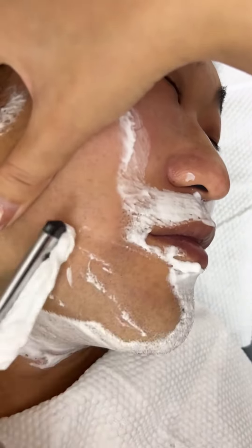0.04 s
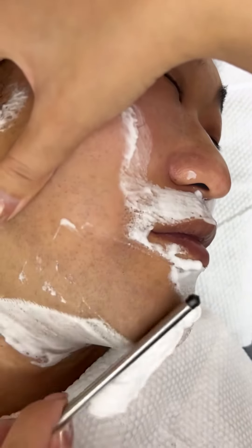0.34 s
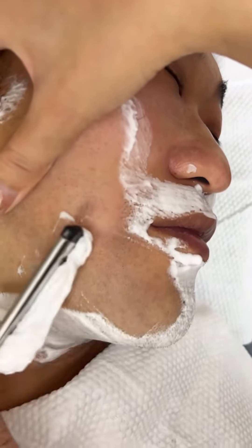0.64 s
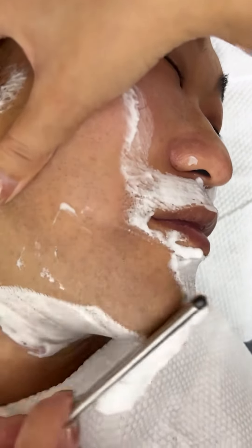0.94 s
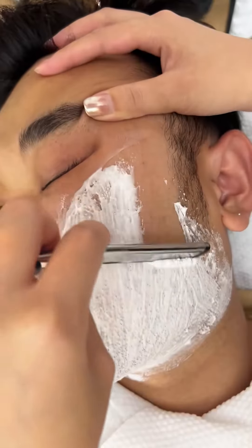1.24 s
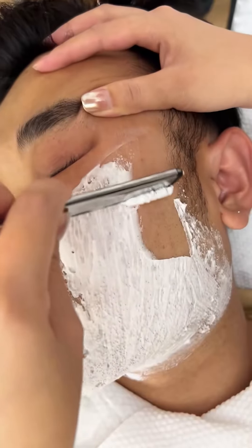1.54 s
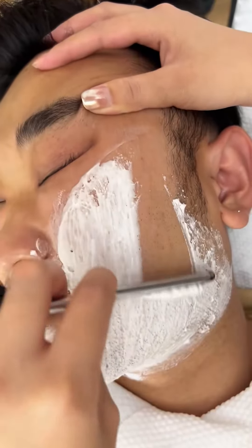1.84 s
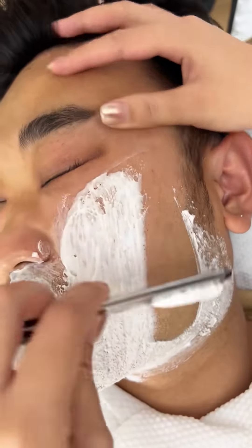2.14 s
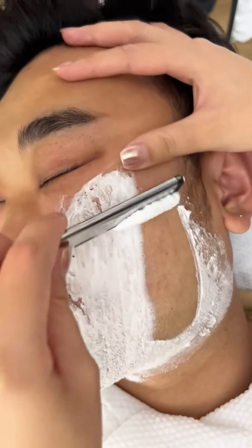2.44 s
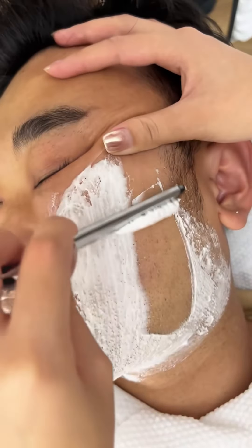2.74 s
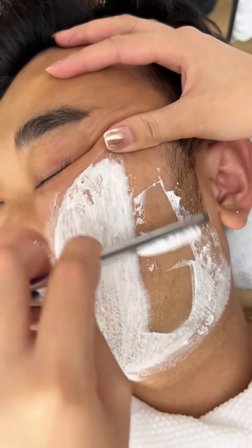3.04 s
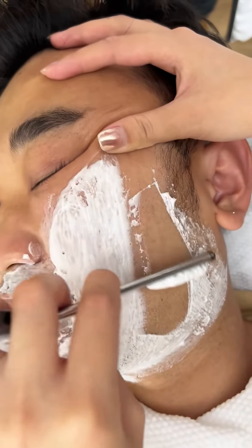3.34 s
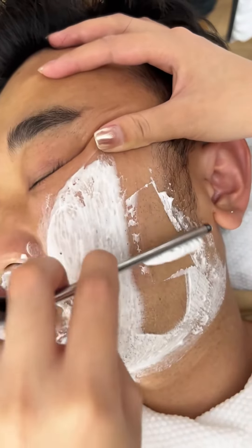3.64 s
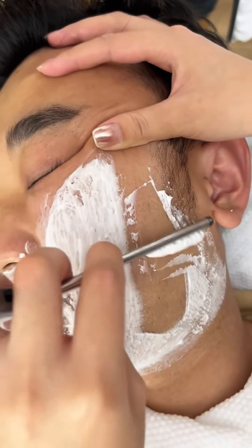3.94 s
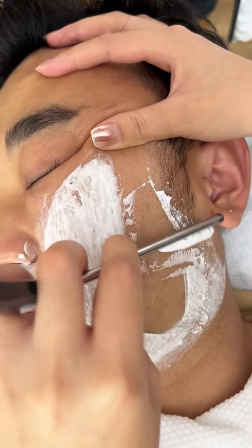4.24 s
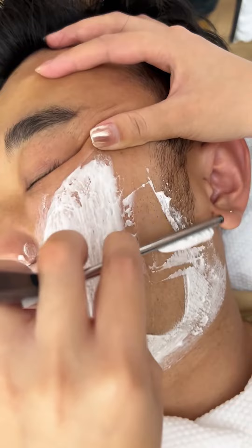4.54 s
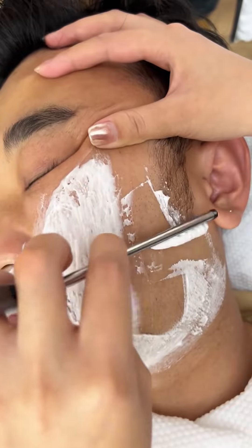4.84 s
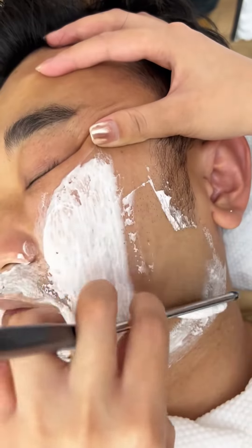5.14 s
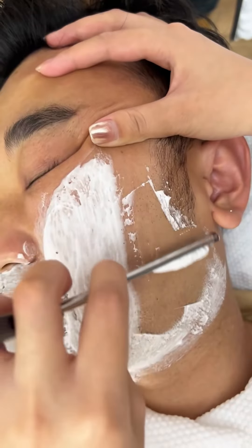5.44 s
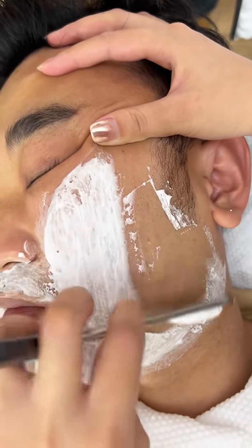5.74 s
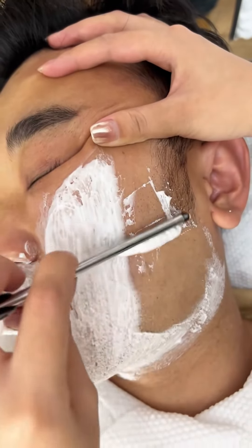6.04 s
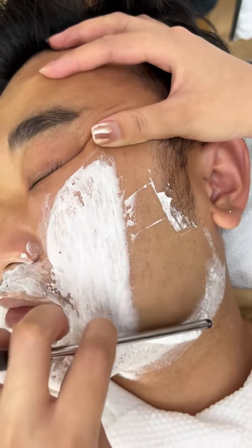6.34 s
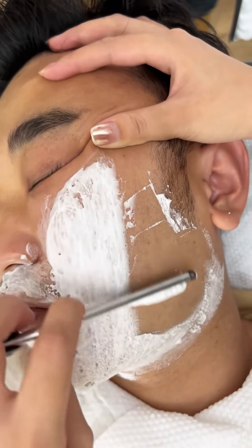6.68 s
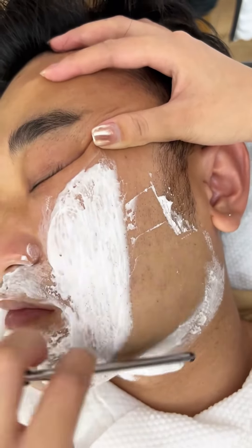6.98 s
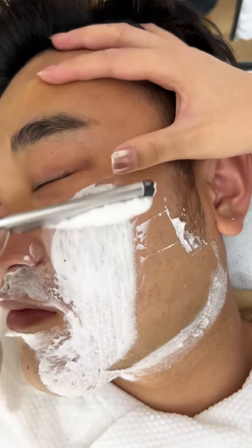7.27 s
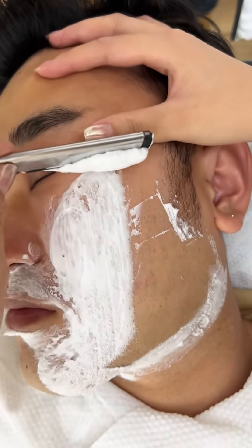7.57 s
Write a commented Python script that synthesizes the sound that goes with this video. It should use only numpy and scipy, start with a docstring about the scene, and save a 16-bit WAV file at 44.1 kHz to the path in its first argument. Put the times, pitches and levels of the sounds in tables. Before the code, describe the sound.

In a quiet shop with a faint ventilation hum, a straight razor rasps through stubble, heard very close. It opens with two longer, bright scrapes, then moves to quick, uneven strokes mixed with the light hiss of steel gliding on lather. Tiny snaps of cut hair and a few dull hand bumps come through, and the last strokes are fuller and louder.

```python
"""A straight razor shaves a lathered face, close up: two long strokes on the chin, then short ones
down the cheek to the jaw. The edge catches and snaps stubble in quick uneven ticks over a fine
crackle; between cuts the blade slides on lather with a soft hiss. Hands bump softly now and then,
and the ventilation of a small shop hums behind."""
import sys
import numpy as np
from scipy import signal
from scipy.fft import rfft, irfft
from scipy.io import wavfile
from scipy.ndimage import uniform_filter1d, map_coordinates

SR = 44100
rng = np.random.default_rng(int(sys.argv[2]) if len(sys.argv) > 2 else 0)


def digitize_waveform(pressure):
    """Quantize a signal to 16-bit integers and store it at the path in sys.argv[1].

    Rows of a 2-D input are taken as channels; values are limited to [-1, 1].
    """
    field = np.atleast_2d(pressure).T
    bounded = np.clip(field, -1, 1)
    quanta = np.round(bounded * 32767).astype(np.int16)
    wavfile.write(sys.argv[1], SR, quanta)


N = 344421
T = np.arange(N) / SR

# tone of blade and skin at each place on the face: freq_hz, gain_db
CHIN_EQ = [(300, -16.5), (700, -29.5), (1200, -25), (1800, -17), (2400, -6.5), (2950, -20), (3900, -0.5),
           (4900, -6), (6200, 4.5), (8000, -3.5), (9000, -7.5), (12500, -9.5), (15500, -25.5)]
CHEEK_EQ = [(300, -13), (650, -24.5), (1100, -15), (2000, -14), (2500, -5), (3100, -14.5), (3700, -10),
            (4800, -3), (6200, -0.5), (8300, -4), (9000, -6), (10800, -13), (13000, -6.5), (15500, -21)]
LOWER_CHEEK_EQ = [(300, -12.5), (680, -22.5), (1200, -7), (1500, -15.5), (2000, -10.5), (2450, -3.5),
                  (3200, -13.5), (3700, -7), (4700, 4.5), (6200, -2), (8000, -4), (11000, -13.5),
                  (12700, -7), (15500, -25)]
JAW_EQ = [(300, -11), (680, -23.5), (1150, -5), (1450, -12.5), (1900, -6), (2350, 1.5), (3050, -15),
          (3700, -5), (4700, -2.5), (5500, -8), (7800, -7), (11000, -10), (12700, -10), (15500, -25)]
# cutting strokes, with body (lows) and fizz (top) relative to the scrape:
# start_s, attack_s, hold_s, release_s, scrape_db, release_fall_db, body_db, fizz_db, place
CUTTING_STROKES = [ (0.166, 0.067, 0.13, 0.057, -27, 16, -12.5, -8.5, "chin"),
                   (0.724, 0.08, 0.2, 0.0066, -26.5, 3, -14, -8.5, "chin"),
                   (1.126, 0.033, .12, 0.037, -45, 10, -16, 0, "cheek"),
                   (1.775, 0.088, .015, 0.19, -34, 19, -12.5, -5.5, "cheek"),
                   (2.836, .065, .045, 0.034, -47.5, 15, -9.5, -1.5, "cheek"),
                   (3.207, .16, 0.023, .012, -43.5, 8, -12.5, -6, "cheek"),
                   (3.643, 0.028, 0.054, .05, -41.5, 11, -11, -6.5, "cheek"),
                   (3.965, .078, .012, .028, -31.5, 18, -10.5, -10.5, "cheek"),
                   (4.272, 0.046, .04, 0.026, -34.5, 13.5, -12.5, -10.5, "cheek"),
                   (4.561, 0.13, 0.0075, .014, -38, 10, -13.5, -9, "cheek"),
                   (4.955, 0.13, 0.026, 0.073, -31.5, 11, -8, -8, "lower cheek"),
                   (5.521, .075, 0.079, .045, -34.5, 11, -5.5, -9.5, "lower cheek"),
                   (6.207, .07, 0.036, .066, -29.5, 13, -3.5, -11, "jaw"),
                   (6.684, .15, 0.071, 0.064, -24.5, 21, -9.5, -11, "jaw"), ]

# bands in which a layer's level is set
LOW_HZ, MID_HZ, BODY_HZ = (30, 300), (400, 900), (800, 2800)
SCRAPE_HZ, FIZZ_HZ, BRIGHT_HZ = (3200, 9000), (9000, 15000), (3200, 15000)


def undb(db):
    """Decibels to gain."""
    return 10 ** (np.asarray(db) / 20)


def unit(x):
    """Scale to unit power."""
    return x / np.sqrt(np.mean(x ** 2))


def noise():
    """White noise of unit power."""
    return rng.standard_normal(N)


def wander(rate_hz):
    """Smooth random modulation with a spread near 1."""
    hold = int(SR / rate_hz)
    steps = np.repeat(rng.standard_normal(N // hold + 1), hold)
    return 1.296 * uniform_filter1d(uniform_filter1d(steps, hold), hold)[:N]


def below(x, hz):
    """Zero-phase low-pass."""
    return signal.sosfiltfilt(signal.butter(6, hz, fs=SR, output="sos"), x)


def equalise(x, curve, band_hz, size=2048):
    """Minimum-phase EQ; unit white noise comes out with unit power inside the band."""
    hz, db = np.transpose(curve)
    freqs = np.arange(size // 2 + 1) * SR / size
    gain = undb(np.interp(np.log(freqs + 1), np.log(hz), db))
    gain /= np.sqrt(np.mean(gain ** 2 * ((freqs > band_hz[0]) & (freqs < band_hz[1]))))
    cepstrum = irfft(np.log(gain))
    cepstrum[1:size // 2] *= 2
    cepstrum[size // 2 + 1:] = 0
    return signal.oaconvolve(x, irfft(np.exp(rfft(cepstrum))))[:N]


def ventilation(rumble_trim_db, rush_trim_db, hiss_db, waver_hz):
    """The air bed: the shop's rumble, rushing air and a wavering hum. Beside it, a broad hiss swells over the
    first second and stops at 1.03 s."""
    # level ride of the bed: time_s, rumble_db, rush_db
    air_levels = [(0, -50, -60.5), (0.95, -51, -59), (1.08, -50, -71), (1.8, -57.5, -71),
                  (2.45, -52.5, -69), (2.85, -56.5, -70.5), (3.85, -54, -71.5), (4.3, -55.5, -67),
                  (6.3, -52, -63), (7.81, -47.5, -62)]
    # tone of each noise layer: freq_hz, gain_db
    rumble_eq = [(20, -8.5), (50, 1), (80, 2), (110, -1), (150, -3), (180, -4.5), (215, 4), (260, -9.5),
                 (340, -15.5), (600, -33), (2000, -61)]
    rush_eq = [(200, -1), (430, 4), (640, -2), (900, 2.5), (1350, -5.5), (1850, 0), (2400, -4.5),
               (3100, -15), (5500, -18), (10000, -34.5), (13800, -34.5), (15000, -42.5)]
    hiss_eq = [(300, -2.5), (900, -1), (1400, -4), (2400, -5), (3000, -6), (6000, -10), (9000, -19.5),
               (14000, -23.5), (15500, -30)]
    # two hum tones: pitch_hz, level_db
    hum_tones = [(200, -66.5), (220, -64)]
    times, *levels = np.transpose(air_levels)
    rumble_db, rush_db = (np.interp(T, times, level) for level in levels)
    rumble = undb(rumble_db + rumble_trim_db + 1.7 * wander(10)) * equalise(noise(), rumble_eq, LOW_HZ)
    rush = undb(rush_db + rush_trim_db + 2 * wander(17)) * equalise(noise(), rush_eq, MID_HZ)
    hiss_swell = np.minimum(T / .86 + .12, 1) * (T < 1.03)
    hiss = undb(hiss_db) * hiss_swell * equalise(noise(), hiss_eq, MID_HZ)
    hum = 0
    for pitch_hz, level_db in hum_tones:
        gain = undb(level_db + 2.5 * wander(4.3))
        hum += gain * np.sin(2 * np.pi * np.cumsum(pitch_hz + waver_hz * wander(14)) / SR)
    dip = undb(-13.5 * np.exp(-.5 * ((T - .76) / .009) ** 2))  # the bed dips briefly
    return (rumble + rush + hiss + hum) * dip


def microphone_hiss(level_db):
    """A faint, even noise floor."""
    return undb(level_db) * below(noise(), 13800)


def ticks(rate_hz, uneven, scatter_db, snap_s, count=12000, size=128):
    """Crackle: tiny releases of force at uneven intervals, each with its own size and tone."""
    gap, strength = rng.standard_normal((count, 2)).T
    travel = np.cumsum(rate_hz * np.ones(N)) / SR
    onsets = np.searchsorted(travel, np.cumsum(np.exp(uneven * gap)))
    age = np.arange(1, size + 1) / (snap_s * SR)
    bursts = rng.standard_normal((count, size)) * np.sqrt(age) * np.exp(-age)
    # capped, as a hair holds only so much force before it is cut
    bursts *= (undb(scatter_db * np.tanh(strength)) / np.linalg.norm(bursts, axis=1))[:, None]
    heard = onsets < N
    samples = onsets[heard, None] + np.arange(size)
    force = np.bincount(samples.ravel(), bursts[heard].ravel(), N)[:N]
    return unit(force / np.sqrt(rate_hz))


def pressure(start, attack, hold, release, fall_db):
    """Span and envelope of one blade pass: it lands, swells as the hand presses, holds, eases, lifts."""
    land_db_per_s, lift_db_per_s = 1500.5, 1200.5
    end = start + attack + hold + release
    span = slice(*np.searchsorted(T, [start - .1, end + .1]))
    t = T[span]
    attack_db = 19 * np.clip(1 - (t - start) / attack, 0, 1) ** 1.9
    ease_db = fall_db * np.clip(1 - (end - t) / release, 0, 1) ** 1.4
    off_skin_db = land_db_per_s * np.maximum(start - t, 0) + lift_db_per_s * np.maximum(t - end, 0)
    return span, undb(-attack_db - ease_db - off_skin_db)


def lather_slides(bubbles_db):
    """Steel on wet skin: a smooth hiss with tiny bursting bubbles of lather."""
    # passes that glide without cutting: start_s, attack_s, hold_s, release_s, level_db
    slides = [ (0.063, 0.096, .01, .02, -46.5), (1.08, 0.021, 0.044, .03, -46.5),
              (1.333, .018, 0.0047, 0.032, -61), (1.556, 0.053, .17, 0.033, -51),
              (2.696, .04, .08, .02, -60), (3.013, 0.019, .005, 0.026, -64),
              (3.196, 0.032, 0.022, 0.019, -57.5), (3.453, 0.024, 0.0046, .04, -61),
              (3.548, 0.026, 0.0056, 0.031, -60.5), (3.809, 0.03, 0.019, 0.069, -53),
              (4.118, 0.033, 0.0049, .06, -41), (4.417, 0.048, 0.012, 0.047, -47),
              (4.747, 0.044, 0.023, 0.057, -43), (4.888, 0.037, 0.05, .03, -53),
              (5.435, 0.031, 0.067, .02, -52.5), (6.03, 0.16, 0.032, 0.018, -48.5),
              (6.617, 0.051, 0.022, .02, -49.5), (6.984, 0.017, 0.0034, .01, -49.5), ]
    # tone of the early slides in thick lather (one narrow resonance) and the rest: freq_hz, gain_db
    thick_eq = [(800, -30.5), (3300, -19.5), (4900, -10.5), (5800, -6), (7000, -1.5), (8300, -9),
                (11000, -11), (13000, -11), (15500, -25.5)]
    slide_eq = [(800, -32), (2300, -18.5), (3200, -13.5), (4600, 1), (5600, 1), (6800, 1.5), (8400, -1),
                (9500, -8.5), (11000, -20.5), (13000, -6), (15500, -27)]
    bubbles = ticks(300, uneven=.8, scatter_db=6, snap_s=.00015)
    gain = np.zeros(N)
    for *timing, level_db in slides:
        span, press = pressure(*timing, fall_db=19)
        gain[span] += undb(level_db) * press
    foam = unit(noise() + undb(bubbles_db) * bubbles) * gain
    thick = T < 2.95
    return equalise(foam * thick, thick_eq, BRIGHT_HZ) + equalise(foam * ~thick, slide_eq, BRIGHT_HZ)


def hand_bumps():
    """Hands shift on the face and towel: a low thud with some dull rustle."""
    # soft bumps, rustle relative to thud: centre_s, level_db, width_s, rustle_db
    bumps = [(0.111, -44, 0.02, -33), (0.283, -43.5, 0.0064, -5), (0.621, -47, 0.019, 0),
             (0.68, -45, 0.0069, -11), (3.077, -54, 0.012, -37), (4.374, -50, .014, -7),
             (4.433, -48, 0.0088, -39), (4.477, -42, 0.0084, -33), (4.891, -44, 0.0087, -24)]
    # tone of thud and rustle: freq_hz, gain_db
    thud_eq = [(40, -9), (135, -7), (210, 8), (290, -10.5), (600, -39), (2000, -52.5)]
    rustle_eq = [(150, -7), (330, -0.5), (900, -9), (1400, -19), (3000, -27), (9000, -37)]
    thud, rustle = np.zeros((2, N))
    for centre_s, level_db, width_s, rustle_db in bumps:
        swell = undb(level_db) * np.exp(-.5 * ((T - centre_s) / width_s) ** 2)
        thud += swell
        rustle += swell * undb(rustle_db)
    return thud * equalise(noise(), thud_eq, LOW_HZ) + rustle * equalise(noise(), rustle_eq, MID_HZ)


def lone_snaps(trim_db, snap_s, tail_db, tail_s, size=600):
    """Sharp ticks, each with a faint tail from nearby surfaces, coloured by where the blade is."""
    # stout hairs and touches of the edge that stand out: start_s, level_db
    accents = [(0.1516, -16), (0.1715, -11), (0.7018, -15.5), (0.7098, -14), (0.7172, -13), (0.7309, -5.5),
               (0.7354, -3), (0.7577, -4), (0.818, -2), (0.8245, 1), (0.8507, -9), (0.9615, 1.5),
               (1.138, -20.5), (1.5983, -22.5), (2.7492, -27), (2.81, -24), (2.829, -21.5), (2.8627, -22),
               (2.8746, -22), (2.904, -18), (3.2956, -19), (3.4277, -23), (3.7806, -23.5), (3.9634, -25),
               (4.049, -17), (4.577, -26), (5.448, -21), (5.533, -17), (6.0562, -24), (6.2647, -10),
               (6.345, -8), (6.3767, -14), (6.9134, -13), (6.9905, -15)]
    t, force = np.arange(size) / SR, np.zeros(N)
    decay = np.exp(-t / snap_s) + undb(tail_db) * np.exp(-t / tail_s)
    for start_s, level_db in accents:
        burst = rng.standard_normal(size) * decay
        onset = int(start_s * SR)
        force[onset:onset + size] += undb(level_db + trim_db) * burst / np.linalg.norm(burst)
    arrivals_s = [min(start for start, *_, where in CUTTING_STROKES if where == place)
                  for place in ("cheek", "lower cheek", "jaw")]
    place_index = np.searchsorted(arrivals_s, T)
    curves = CHIN_EQ, CHEEK_EQ, LOWER_CHEEK_EQ, JAW_EQ
    return sum(equalise(force * (place_index == k), eq, BRIGHT_HZ) for k, eq in enumerate(curves))


def stroke_envelopes(place):
    """Gains of scrape, body and fizz at one place; pressing harder brings out the body."""
    scrape, body, fizz = np.zeros((3, N))
    drag = undb(1.36 * wander(44.84))  # the edge drags unevenly over the skin
    for *timing, scrape_db, fall_db, body_db, fizz_db, where in CUTTING_STROKES:
        if where == place:
            span, press = pressure(*timing, fall_db)
            scrape[span] += undb(scrape_db) * press
            body[span] += undb(scrape_db + body_db) * press ** 1.4
            fizz[span] += undb(scrape_db + fizz_db) * press ** 1.1
    return scrape * drag, body * drag, fizz * drag


def cutting(place, eq, base_rate_hz, scatter_db, fine_db, hiss_db):
    """Stubble snaps over fine-hair crackle and foam hiss; the snaps carry the body, the foam the top."""
    scrape_gain, body_gain, fizz_gain = stroke_envelopes(place)
    # a faster blade is louder and meets more hairs a second
    speed = np.clip((scrape_gain / undb(-35)) ** .3, .55, 1.5)
    stubble = ticks(base_rate_hz * speed, uneven=.38, scatter_db=scatter_db, snap_s=.00028)
    fine_hairs = undb(fine_db) * ticks(1000, uneven=.6, scatter_db=4, snap_s=.0003)
    texture = fine_hairs + undb(hiss_db) * noise()
    body = equalise(unit(stubble + undb(-1.5) * texture) * body_gain, eq, BODY_HZ)
    scrape = equalise(unit(stubble + texture) * scrape_gain, eq, SCRAPE_HZ)
    fizz = equalise(unit(stubble + undb(5) * texture) * fizz_gain, eq, FIZZ_HZ)
    sound = below(body - scrape, 3000) + below(scrape - fizz, 9000) + fizz  # three-way crossover
    return sound - below(sound, 140)  # so small a source radiates no deep bass


def hand_reflections(x, lag_s, travel, echo_db):
    """Reflections from the moving hand and the face comb the sound, so its resonances wander."""
    combed = x
    for path_s in (lag_s, 2 * lag_s):
        delay_s = path_s * np.exp(travel * wander(3))
        combed = combed + undb(echo_db) * map_coordinates(x, [(T - delay_s) * SR], order=3)
    return combed / np.sqrt(1 + 2 * undb(echo_db) ** 2)


def shop_reverb(x, t60_s, wet_db, damp_hz):
    """A short, slightly dull tail from the walls of the shop."""
    t = T[:SR // 2]
    tail = rng.standard_normal(len(t)) * np.exp(-np.log(1000) * t / t60_s) * np.minimum(t / .006, 1)
    tail = signal.lfilter([1], [1, -np.exp(-2 * np.pi * damp_hz / SR)], tail)
    return x + undb(wet_db) * signal.oaconvolve(x, tail / np.linalg.norm(tail))[:N]


def scene():
    """Razor, hands and shop at one close microphone."""
    razor = cutting("chin", CHIN_EQ, base_rate_hz=200, scatter_db=6, fine_db=-5, hiss_db=-7)
    razor += cutting("cheek", CHEEK_EQ, base_rate_hz=190, scatter_db=4.5, fine_db=-4.5, hiss_db=-5.5)
    razor += cutting("lower cheek", LOWER_CHEEK_EQ,
                     base_rate_hz=220, scatter_db=1.5, fine_db=-2, hiss_db=-2.5)
    razor += cutting("jaw", JAW_EQ, base_rate_hz=175, scatter_db=2.5, fine_db=-5.5, hiss_db=-5.5)
    razor += lone_snaps(trim_db=-1, snap_s=.00059, tail_db=-11, tail_s=.0033)
    razor += lather_slides(bubbles_db=1.5)
    razor = hand_reflections(razor, lag_s=.0006995, travel=.18, echo_db=-14)
    razor = shop_reverb(razor, t60_s=.35, wet_db=-23, damp_hz=3000)
    bed = ventilation(rumble_trim_db=-1, rush_trim_db=-.5, hiss_db=-62, waver_hz=3)
    bed += microphone_hiss(level_db=-76.5)
    return (razor + hand_bumps() + bed)[None]


def record(dry):
    """The microphone rounds the loudest peaks and cuts the top."""
    ceiling, top_hz = .62, 15250
    rounded = ceiling * np.tanh(dry / ceiling)
    return signal.sosfilt(signal.ellip(10, .2, 80, top_hz, fs=SR, output="sos"), rounded)


dry = scene()
out = record(dry)
digitize_waveform(out)
```